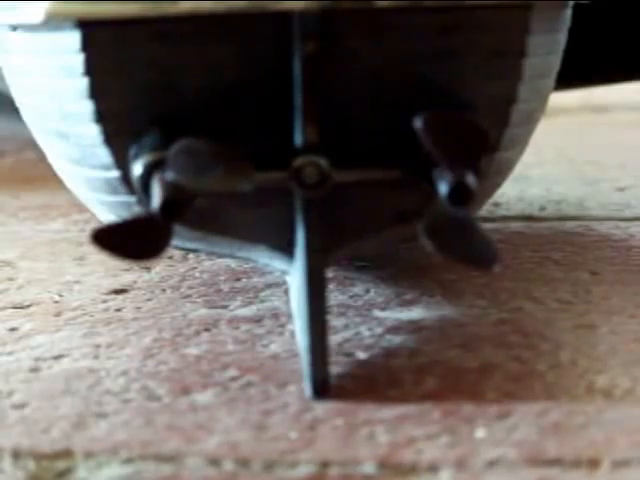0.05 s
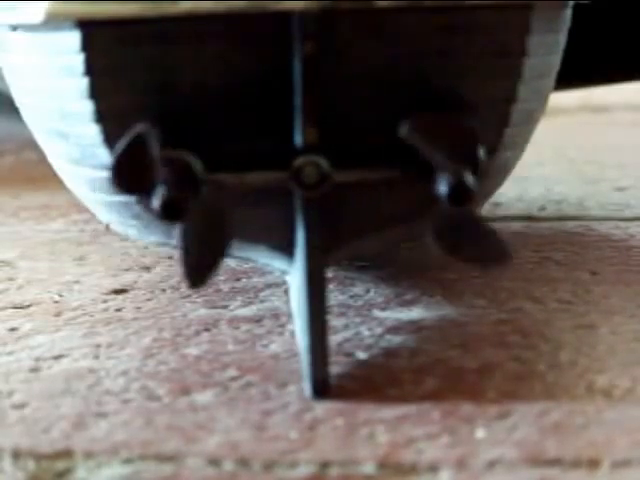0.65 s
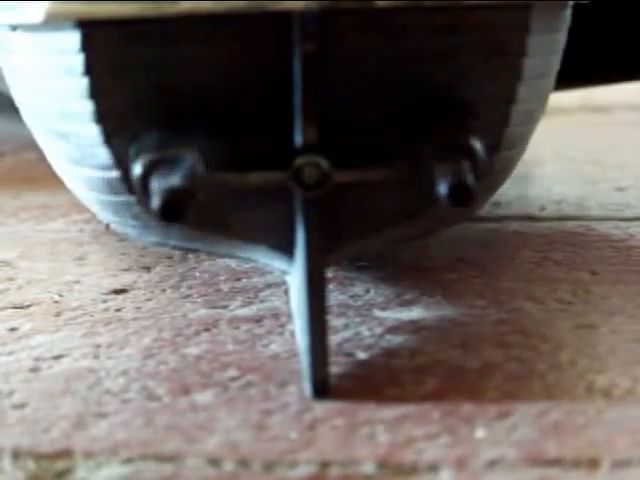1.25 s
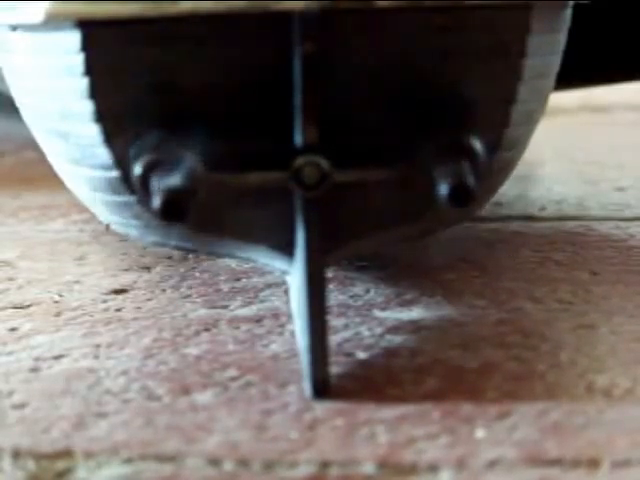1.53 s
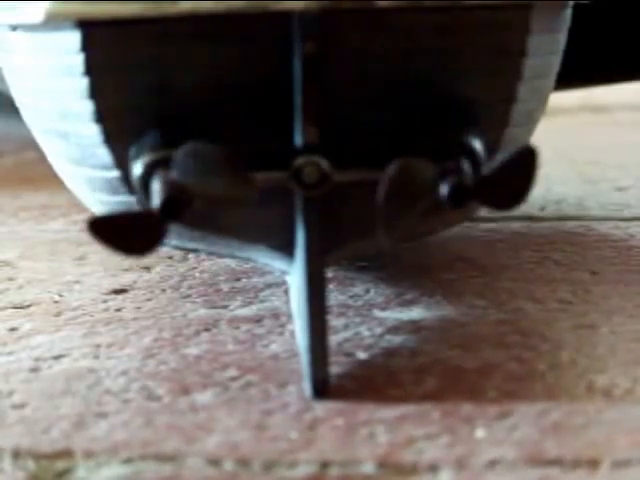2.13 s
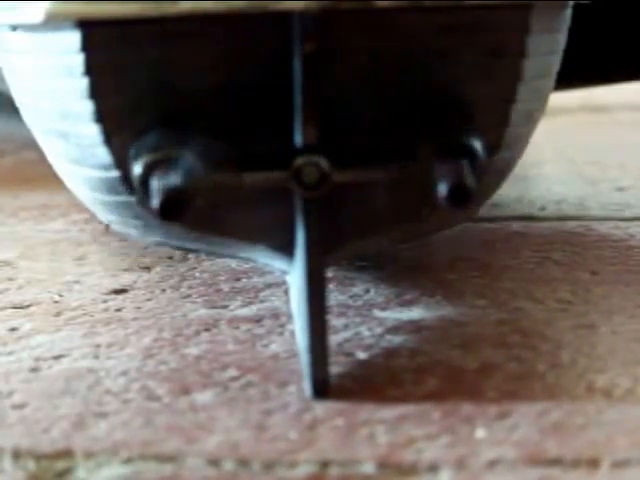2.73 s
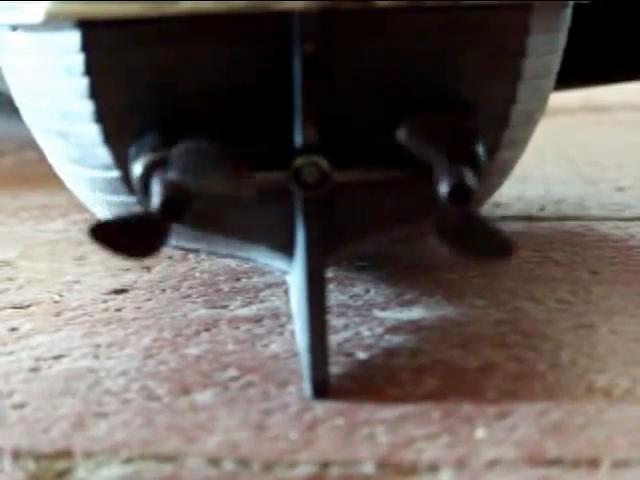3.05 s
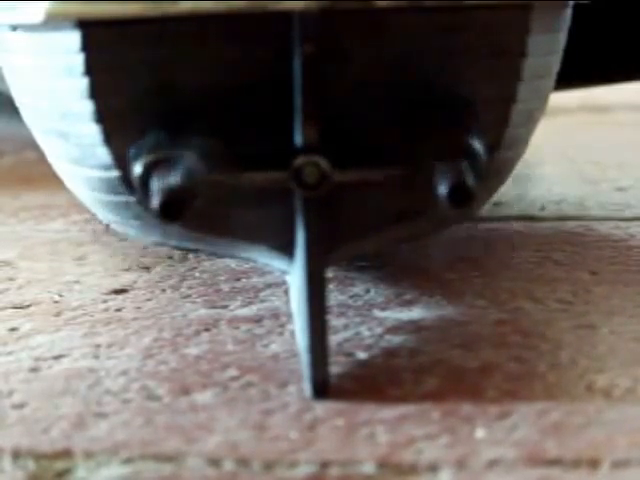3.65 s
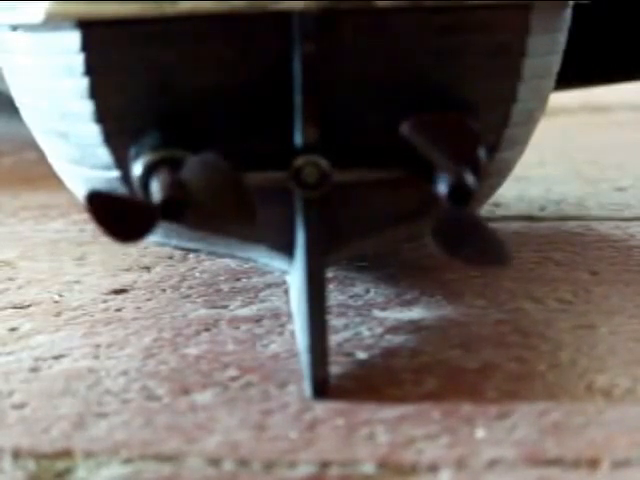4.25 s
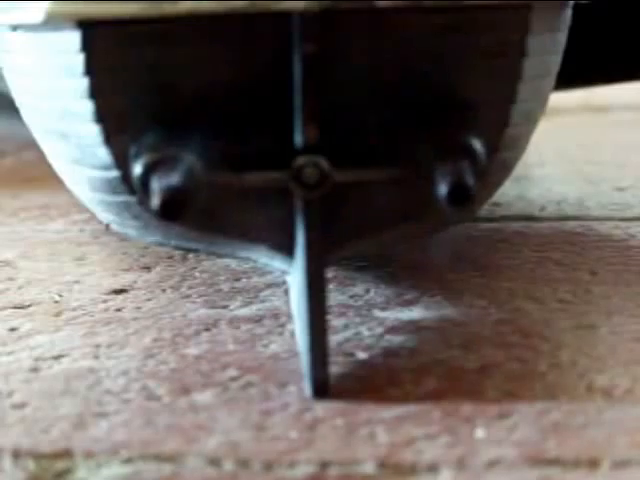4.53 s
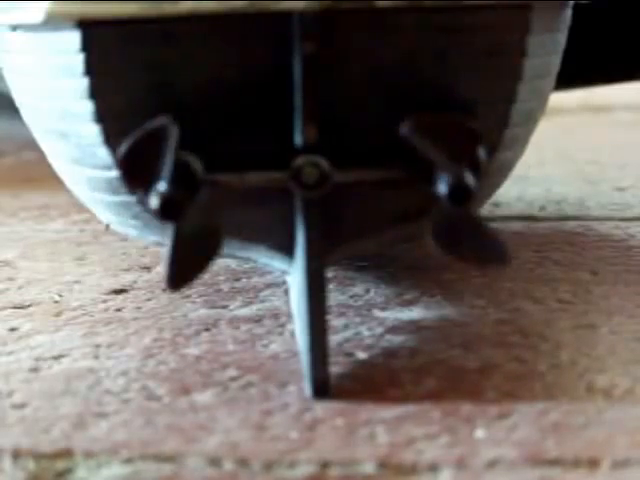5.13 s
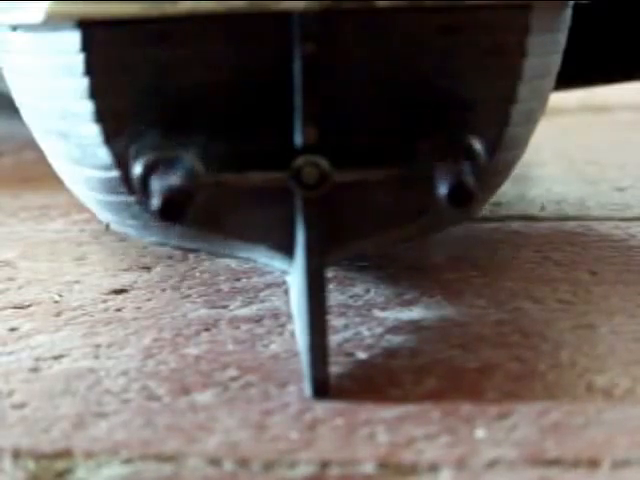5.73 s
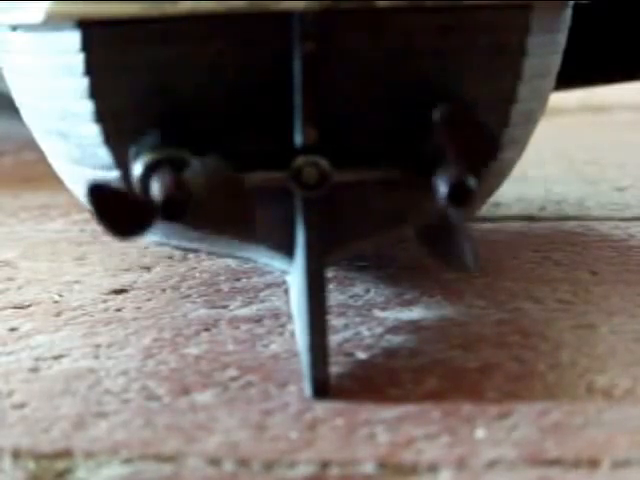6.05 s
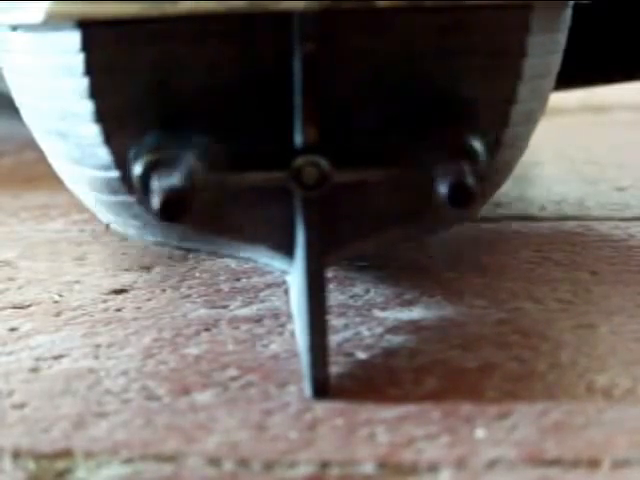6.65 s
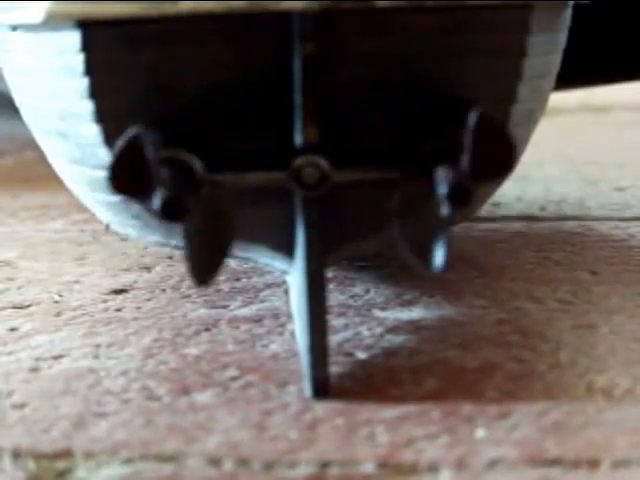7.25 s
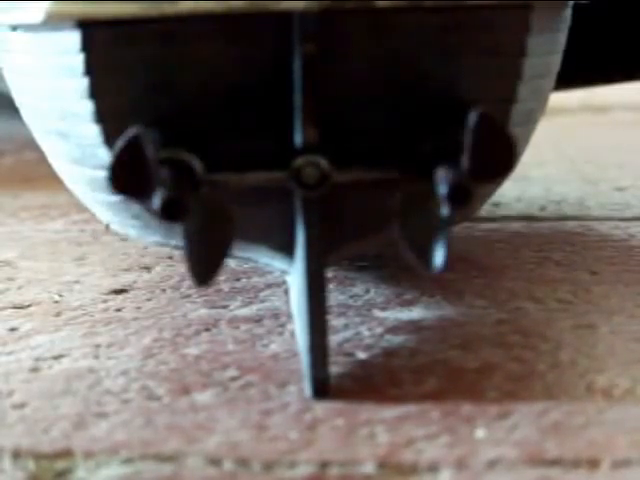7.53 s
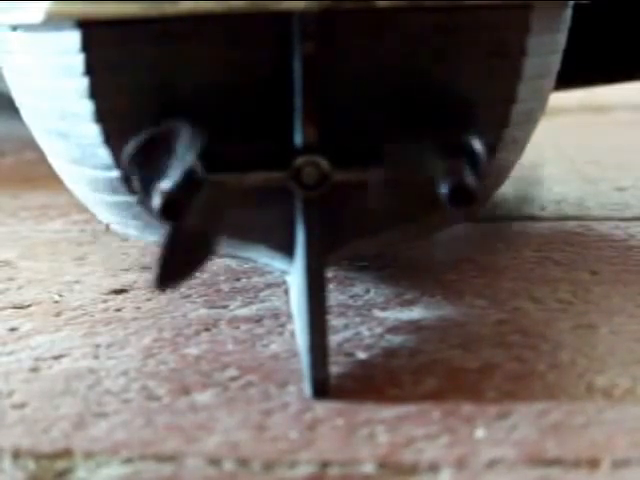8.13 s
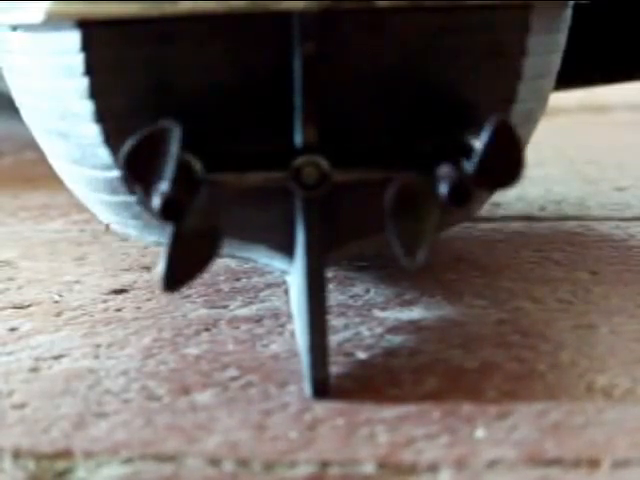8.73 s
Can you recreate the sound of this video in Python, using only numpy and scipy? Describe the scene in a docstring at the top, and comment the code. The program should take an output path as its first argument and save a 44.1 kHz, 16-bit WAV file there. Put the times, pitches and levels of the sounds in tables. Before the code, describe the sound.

A model boat's two small electric motors run in eight short bursts, roughly a second apart. Each begins with a faint switch tick, then the propellers race up with a whine and a gear clatter in the hollow hull before quickly coasting to a stop. A few light taps on the boat fall between bursts. The microphones are close to the stern, in a hard-walled, ringing room with a faint low rumble and hum.

```python
"""A low rumble and hum in a hard-walled room, then the faint tick of a switch: a model boat on the floor.
Its two propeller motors run in eight short bursts. Each time they race up, their gears clatter into the
hollow hull, and they coast to a stop while the room rings on. A few light taps on the boat fall between,
and a last faint switch tick comes at the very end.
Heard on a pair of microphones close to the stern, the two drives set a little apart."""
import sys
import numpy as np
from scipy import signal
from scipy.fft import rfft, irfft, next_fast_len
from scipy.io import wavfile

SR = 44100
rng = np.random.default_rng(int(sys.argv[2]) if len(sys.argv) > 2 else 0)


def generate_wav(signal):
    """Clip the signal to [-1, 1] and save it as 16-bit WAV at the path in sys.argv[1]."""
    frames = np.transpose(np.atleast_2d(signal))
    scaled = np.clip(frames, -1, 1) * 32767
    pcm = np.round(scaled).astype(np.int16)
    wavfile.write(sys.argv[1], SR, pcm)


N = 392490
T = np.arange(N) / SR

# Levels in the tables are relative, ahead of the mix. Room air: f/Hz, spectral level/dB
AIR_COLOUR = [(180, -33), (300, -14), (397, -7.5), (436, -8), (472, -11), (547, -12), (634, -10),
              (946, -13), (1130, -11), (3020, -11), (3600, -13), (5020, -15.5), (5440, -17.5),
              (6300, -21.5), (7300, -40), (9490, -61.5), (16100, -120)]
# low rumble: f/Hz, spectral level/dB
RUMBLE_COLOUR = [(11, -43.5), (18, 0.5), (32, 0.5), (48, 0.5), (58, -4), (71, -15.5), (102, -6),
                 (118, -9.5), (163, -15.5), (201, -9.5), (216, -17.5), (248, -13), (260, -22.5),
                 (276, -37.5), (300, -42), (390, -68.5), (660, -120)]
# hum lines: f/Hz, level/dB
HUM_LINES = [(42, -2.5), (128, -3), (160, 0)]
# slow swell and fade of the background: t/s, rumble level/dB, hum level/dB
BACKGROUND_LEVELS = [(0.0, -51.5, -64), (2.58, -50.5, -55.5), (5.53, -50.5, -62.5), (6.32, -54, -64.5),
                     (8.23, -54, -64.5), (8.9, -55.5, -72)]
# ring time of the room: f/Hz, t60/s
ROOM_T60 = [(200, 1), (500, 1), (1500, 1), (3000, 0.96), (6000, 0.79)]
# likeness of the room sound at the two microphones: f/Hz, correlation
ROOM_CORRELATION = [(100, 0.92), (400, 0.85), (530, 0.88), (750, 0.7), (1000, 0.44), (1300, 0.63),
                    (1650, 0.3), (2050, 0.17), (2500, 0.095), (3100, -0.23), (3800, -0.042), (4600, -0.19),
                    (5500, 0.29), (6700, 0.08)]
# colour difference between the microphones: f/Hz, left minus right/dB
MIC_BALANCE = [(60, -6.5), (87, 5), (120, -6), (180, -4.5), (260, -5), (380, -2.5), (540, -7), (780, -5),
               (1130, -5), (1630, -5), (2350, -1), (3390, 1), (4890, -0.5), (7050, 0)]
# light taps on the boat, and a last faint switch tick: t/s, click level/dB, hull tock level/dB
TAPS_AND_LAST_TICK = [(1.98, -34, -34.5), (2.262, -26, -38), (2.299, -31.5, -46), (7.385, -32, -24.5),
                      (8.874, -31, -42)]
# switch ticks and tap clicks: f/Hz, spectral level/dB
TICK_COLOUR = [(250, -38), (550, 4), (1000, -7.5), (2000, 3.5), (3200, -5), (4700, -2.5), (7000, -26)]
# hollow tock of the hull: f/Hz, spectral level/dB
TOCK_COLOUR = [(280, -22), (450, -9.5), (570, 10), (850, -9.5), (1400, -8), (2000, 0), (4000, -4.5),
               (5200, -19), (7000, -30.5)]
# broad colour of a drive in its hull: f/Hz, spectral level/dB
HULL_COLOUR = [(200, -43), (330, -39), (380, -34), (470, -15.5), (620, -18), (820, -8), (1300, -4.5),
               (2000, 1.5), (3200, -1), (3900, -9), (4600, -10.5), (5300, -16.0), (6000, -18),
               (7200, -37.5)]
# resonances and hollows of the hull: f/Hz, width/Hz, gain/dB
HULL_MODES = [(364, 13, 13), (429, 43, 9), (520, 71, 5.5), (580, 160, 8), (731, 84, 8.5), (875, 100, 4.5),
              (971, 24, -14.5), (997, 29, 3), (1104, 245, 5), (1156, 58, 1), (1289, 80, 3.5), (1493, 51, 2),
              (1684, 160, 5.5), (1722, 18, -6), (1900, 37, 1), (2430, 210, -2), (3117, 76, -6.5),
              (3260, 11, 2), (4000, 29, -6), (4350, 99, 3), (4740, 90, 4.5), (5024, 85, 2.5),
              (4790, 34, 3.5), (5170, 130, 4.5), (5150, 18, 3.5), (5300, 23, 8), (6370, 110, 7),
              (6790, 210, 9)]
# gear clacks and shaft knocks: f/Hz, spectral level/dB
CLACK_COLOUR = [(200, -43), (450, -16.5), (900, -3), (1700, -1), (2300, -6), (3100, 6.5), (3900, -8.5),
                (4500, 1.5), (5300, -10.5), (6200, -20), (7200, -36.5)]
# loudest clacks of the gears: t/s, level/dB
LOUD_CLACKS = [(2.7975, -3.5), (2.8374, -0.5), (3.6732, -3), (4.5122, -2.5), (4.675, -7)]
# tones of the rotor poles and pinion mesh: multiple of rotor speed, level/dB
WHINE_ORDERS = [(2, -21.5), (3, 1), (4, -14.5), (9, 3), (10, 2.5)]
# motor bursts: t/s, length/s, speed aimed for/Hz, level/dB, knock/dB, switch lead/s, tick level/dB
BURSTS = [(0.296, .12, 172.6, -0.5, -5, 0.041, -28), (1.248, .27, 179.2, -0.5, -2.5, 0.069, -31.5),
          (2.707, .17, 186, -0.5, -1, .074, -27.5), (3.642, 0.064, 184.1, -0.5, -0.5, 0.13, -31.5),
          (4.41, .22, 182.5, .5, 0, 0.11, -27.5), (5.673, .22, 181.6, -1, 2, .067, -31.5),
          (6.693, .18, 182.2, -0.5, 2.5, .063, -30.5), (7.866, .22, 176.6, -0.5, -5, 0.056, -26.5)]
# the two drives: speed factor, level/dB, coasting factor, left minus right/dB, knock from shaft play/dB
DRIVES = [(1.0, 0, .82, -1.5, -1.0), (0.99, -1, 1.12, 4.5, -10.5)]

RUN_UP_S, COAST_S, RATED_HZ = .039, .19, 181   # run-up time constant; nominal coast from rated speed
POLES, PULSES_PER_TURN = 3, 10   # pole pulses per turn of the rotor, and of the propeller shaft
CUTOFF_HZ = 7350


def from_db(db):
    """Decibels to gain."""
    return 10 ** (np.asarray(db) / 20)


def unit_power(x):
    """Scale to a mean square of one."""
    return x / np.sqrt(np.mean(x ** 2) + 1e-20)


def at_hz(points, hz):
    """Read a table along log frequency."""
    f, value = np.transpose(points)
    return np.interp(np.log(np.maximum(hz, 1)), np.log(f), value)


def drift(rate_hz):
    """Random wander of spread about one, turning `rate_hz` times a second."""
    knots = rng.standard_normal(4000)
    return np.interp(T * rate_hz, np.arange(len(knots)), knots)


def convolve(x, response):
    """Pass sound through an impulse response, per channel."""
    return signal.oaconvolve(np.atleast_2d(x), np.atleast_2d(response), axes=1)[:, :N]


def bell_db(hz, centre, width, peak_db):
    """Gain curve of one resonance or hollow."""
    return peak_db / (1 + (2 * (hz - centre) / width) ** 2)


def body(colour, modes=(), size=8192):
    """Impulse response of a struck body, of unit energy, from its broad colour and resonances."""
    hz = np.arange(size // 2 + 1) * SR / size
    db = at_hz(colour, hz) - 30 * np.clip(hz / CUTOFF_HZ - 1, 0, 1)
    db += sum(bell_db(hz, *mode) for mode in modes)
    # minimum phase: the ringing follows the blow
    cepstrum = irfft(np.log(from_db(db)))
    cepstrum[1:size // 2] *= 2
    cepstrum[size // 2 + 1:] = 0
    response = irfft(np.exp(rfft(cepstrum)))
    return response / np.linalg.norm(response)


def blows(contacts, scuff_s, scuff_db):
    """Each contact (t/s, level/dB) is a click followed by a short scuff."""
    out, age = np.zeros(N + 4096), np.arange(4096) / SR
    for start, db in contacts:
        hit = from_db(scuff_db) * rng.standard_normal(len(age)) * np.exp(-age / scuff_s)
        hit[0] += 1
        out[int(start * SR):][:len(age)] += from_db(db) * hit
    return out[:N]


def diffuse(size):
    """Spectrum of white noise reaching the microphones from all sides, and its frequencies."""
    mid, side = rfft(rng.standard_normal((2, size)))
    hz = np.arange(len(mid)) * SR / size
    alike = np.clip(at_hz(ROOM_CORRELATION, hz), -1, 1)
    return np.sqrt(1 + alike) * mid + np.sqrt(1 - alike) * side * [[1], [-1]], hz


def coloured_noise(colour):
    """Diffuse noise of unit power with a given colour."""
    noise, hz = diffuse(next_fast_len(N, True))
    return unit_power(irfft(noise * from_db(at_hz(colour, hz)))[:, :N])


def room_tone(air_db=-53, rumble_db=1.0, hum_db=1.5):
    """Air and a low rumble all round the microphones, with a wavering hum."""
    times, rumble_level, hum_level = np.transpose(BACKGROUND_LEVELS)
    rumble = from_db(rumble_db + np.interp(T, times, rumble_level)) * coloured_noise(RUMBLE_COLOUR)
    hum = sum(from_db(db + 2.5 * drift(4.2)) * np.sin(2 * np.pi * hz * T + .73 * drift(6))
              for hz, db in HUM_LINES)
    hum *= from_db(hum_db + np.interp(T, times, hum_level))
    return from_db(air_db) * coloured_noise(AIR_COLOUR) + rumble + hum


def room(direct_db=-3.5, wet_db=-3.0, early_db=10.0, early_s=.018, gap_s=.0012, size=SR):
    """Boat to microphones: direct sound, dense floor and wall reflections, a tail dying band by band."""
    noise, hz = diffuse(size)
    age = np.arange(size) / SR
    tail = 0
    for centre, t60 in ROOM_T60:
        band = at_hz([(f, f == centre) for f, _ in ROOM_T60], hz)
        tail = tail + irfft(noise * band, size) * from_db(-60 * age / t60)
    tail = tail * (1 + from_db(early_db) * np.exp(-age / early_s)) * (age > gap_s)
    response = from_db(wet_db) * unit_power(tail) / np.sqrt(size)
    response[:, 0] += from_db(direct_db)
    return response


def switch_and_taps(tock_db=-1.5):
    """The switch ticks before each burst; light taps and a last faint switch tick also sound the hull."""
    switch = [(on - lead_s, tick_db) for on, *_, lead_s, tick_db in BURSTS]
    clicks = blows(switch + [(t, db) for t, db, _ in TAPS_AND_LAST_TICK], scuff_s=.018, scuff_db=-13.5)
    tocks = blows([(t, db) for t, _, db in TAPS_AND_LAST_TICK], scuff_s=.0087, scuff_db=-3)
    return convolve(clicks, body(TICK_COLOUR)) + from_db(tock_db) * convolve(tocks, body(TOCK_COLOUR))


def coasting_s(length, top_hz):
    """Friction brakes evenly, so the time to stop grows with the speed reached."""
    return COAST_S * top_hz / RATED_HZ * (1 - np.exp(-length / RUN_UP_S))


def spin(coast_factor, bite_s=.0024, stall_db=-.5, coast_db=-1.5, unload_s=.0059):
    """Rotor speed, tooth force and knock gain through the bursts: a fast run-up, then friction brakes."""
    rotor_hz, force, knock_gain = np.zeros((3, N))
    for on, length, top_hz, db, knock_db, *_ in BURSTS:
        part = slice(int(on * SR), int((on + .8) * SR))
        age = np.maximum(T[part] - on, 0)
        since_off = np.maximum(age - length, 0)
        run_down = np.clip(1 - since_off / (coasting_s(length, top_hz) * coast_factor), 0, 1)
        speed = (1 - np.exp(-np.minimum(age, length) / RUN_UP_S)) * run_down
        unloaded = 1 - np.exp(-since_off / unload_s)
        load = from_db(db + stall_db * (1.5 - speed) + coast_db * unloaded)
        rotor_hz[part] = top_hz * speed
        force[part] = load * (1 - np.exp(-age / bite_s)) * run_down ** .99
        knock_gain[part] = from_db(knock_db) * speed ** .82
    return rotor_hz, force, knock_gain


def gear_slack(lead_s=.006, kick_db=-14, stop_db=-9, spread_db=2):
    """The gears take up their slack just before the rotor bites, and fall back as the first shaft stops."""
    stiffest = min(coast_factor for _, _, coast_factor, _, _ in DRIVES)
    kicks = [(on - lead_s, kick_db) for on, *_ in BURSTS]
    stop_times = [on + length + stiffest * coasting_s(length, top_hz) for on, length, top_hz, *_ in BURSTS]
    stops = [(t, stop_db + spread_db * rng.standard_normal()) for t in stop_times]
    slack = blows(kicks, scuff_s=.0078, scuff_db=-10) + blows(stops, scuff_s=.0029, scuff_db=-9)
    return signal.sosfilt(signal.butter(2, [800, 3200], "band", fs=SR, output="sos"), slack)


def gear_clacks(per_s=6, lesser_db=-16.5, spread_db=2.5):
    """Teeth ride up and drop back: a few loud clacks, and chance ones that weaken as the gears slow."""
    speed = spin(coast_factor=.9)[0] / RATED_HZ
    at = np.flatnonzero((rng.random(N) < per_s / SR) & (speed > 0))
    db = lesser_db + 10 * np.log10(speed[at]) + spread_db * rng.standard_normal(N)[at]
    return blows([*LOUD_CLACKS, *zip(T[at], db)], scuff_s=.002, scuff_db=-8.5)


def motor_whine(turns, knock_gain, tone_db=-32.5, flutter_db=3.0, unbalance_db=-53):
    """Poles and pinion sing at multiples of rotor speed; a knocking shaft adds an out-of-balance hum."""
    tones = sum(from_db(tone_db + db + flutter_db * drift(70)) * np.sin(2 * np.pi * order * turns)
                for order, db in WHINE_ORDERS)
    return tones + from_db(unbalance_db) * knock_gain ** 2 * np.sin(2 * np.pi * turns)


def shaft_knocks(pulse_at, decay_s=.0014):
    """Once a turn the propeller shaft meets its tight spot and knocks with a brief scrape."""
    tight_spots = np.zeros(N)
    tight_spots[pulse_at[PULSES_PER_TURN - 1::PULSES_PER_TURN]] = 1
    envelope = signal.lfilter([1], [1, -np.exp(-1 / (decay_s * SR))], tight_spots + 1e-18)
    return envelope * rng.standard_normal(N) * from_db(2 * drift(60))


def gear_rattle(pulses, pulse_at, jitter_s=.0003, wear_db=3.5, chance_db=4.0, rub_db=-12.5, press_db=2.5):
    """Each rotor pole jerks the gears together; their unevenly worn teeth strike and rub."""
    wear = rng.standard_normal(PULSES_PER_TURN)
    wear = np.resize(unit_power(wear - wear.mean()), len(pulse_at))
    hardness, lateness = rng.standard_normal((4000, 2))[:len(pulse_at)].T
    # backlash makes every contact land a little early or late
    landings = np.clip(pulse_at + (jitter_s * SR * lateness).astype(int), 0, N - 1)
    strikes = np.zeros(N)
    strikes[landings] = from_db(wear_db * wear + chance_db * np.clip(hardness, -2, 2))
    rub = from_db(rub_db) * rng.standard_normal(N) * (1 + .48 * np.cos(2 * np.pi * pulses))
    # the propeller gear runs off centre and presses harder once a turn
    press = from_db(press_db * np.cos(2 * np.pi * pulses / PULSES_PER_TURN))
    return press * (strikes + rub)


def drive(speed_factor, coast_factor, wobble=.009, grating_hz=(700, 2600), edges_db=-.5, whine_db=3.5):
    """One motor and gear pair: its rattle, shaft knocks and whine all follow the turning rotor."""
    rotor_hz, force, knock_gain = spin(coast_factor)
    speed = rotor_hz / RATED_HZ
    turns = np.cumsum(rotor_hz * speed_factor * (1 + wobble * drift(40))) / SR
    pulses = POLES * turns
    pulse_at = np.flatnonzero(np.diff(np.floor(pulses)) > 0)
    rattle = force * gear_rattle(pulses, pulse_at)
    # a slow gear only grates in the midrange; speed spreads the sound up and down
    grating = signal.sosfilt(signal.butter(1, grating_hz, "band", fs=SR, output="sos"), rattle)
    rattle = grating + from_db(edges_db) * speed ** .97 * (rattle - grating)
    knocks = np.sqrt(force) * knock_gain * shaft_knocks(pulse_at)
    whine = force * from_db(whine_db) * speed ** 5 * motor_whine(turns, knock_gain)
    return rattle, knocks, whine


def scene(rattle_db=-9.0, knock_db=-6.5, clack_db=4.0):
    """Both drives shake the hull; each stirs the room from its own place."""
    hull, shaft = body(HULL_COLOUR, HULL_MODES), body(CLACK_COLOUR, HULL_MODES)
    contacts = convolve(gear_slack(), hull) + from_db(clack_db) * convolve(gear_clacks(), shaft)
    out = convolve(contacts + switch_and_taps(), room())
    for speed_factor, db, coast_factor, pan_db, play_db in DRIVES:
        rattle, knocks, whine = drive(speed_factor, coast_factor)
        place = from_db(db + pan_db * np.array([[.5], [-.5]]))
        clatter = from_db(rattle_db) * convolve(rattle, hull)
        clatter += from_db(knock_db + play_db) * convolve(knocks, shaft)
        out += convolve(place * clatter, room())
        # the whine comes from the stern, close to the microphones, and is a touch drier
        out += convolve(place * whine, room(wet_db=-3.5))
    return out + room_tone()


def record(dry, ceiling=.8):
    """The microphones differ in colour and share a hollow; peaks are rounded, the top is cut steeply."""
    size = next_fast_len(N + 4096, True)
    spectrum = rfft(dry, size)
    hz = np.arange(spectrum.shape[1]) * SR / size
    balance_db = at_hz(MIC_BALANCE, hz) * np.array([[.5], [-.5]])
    hollow_db = bell_db(hz, centre=295, width=61, peak_db=-9)
    heard = irfft(spectrum * from_db(balance_db + hollow_db), size)[:, :N]
    rounded = heard / (1 + (heard / ceiling) ** 4) ** .25
    return signal.sosfilt(signal.ellip(12, .3, 80, CUTOFF_HZ, fs=SR, output="sos"), rounded)


dry = scene()
out = record(dry)
generate_wav(out)
```